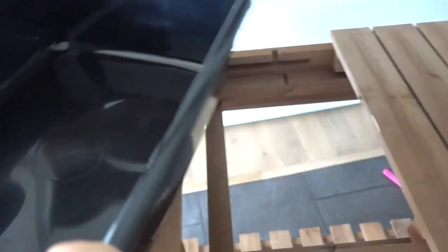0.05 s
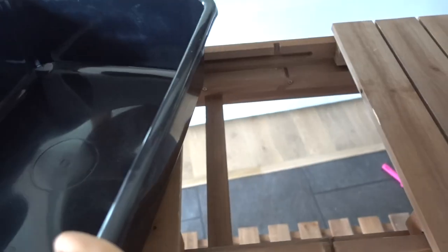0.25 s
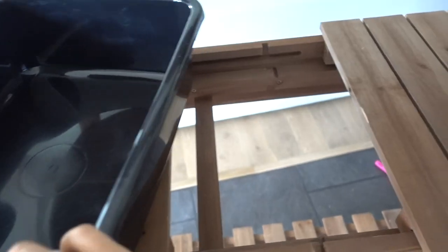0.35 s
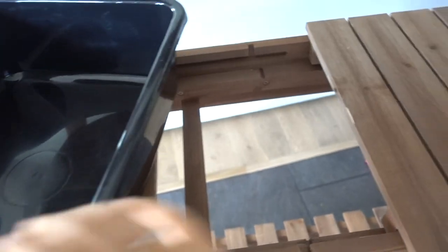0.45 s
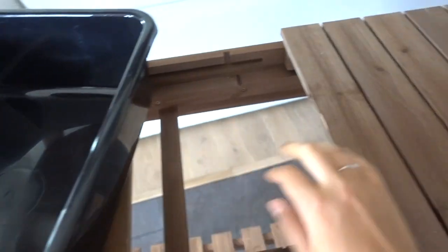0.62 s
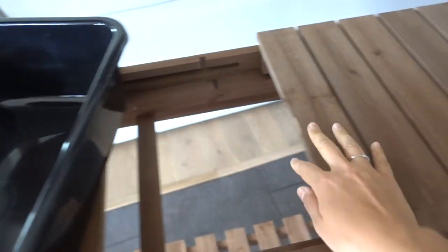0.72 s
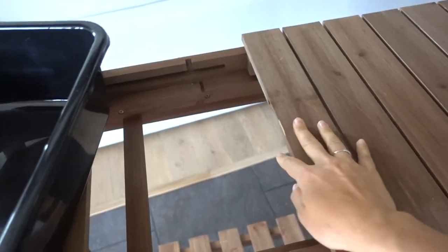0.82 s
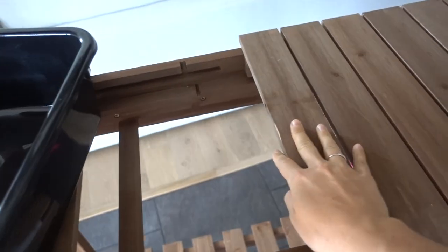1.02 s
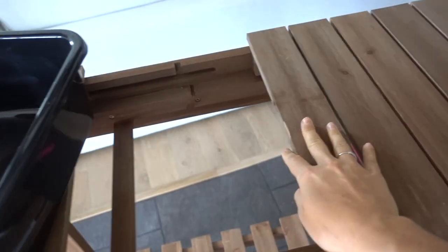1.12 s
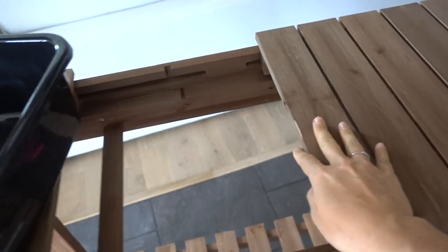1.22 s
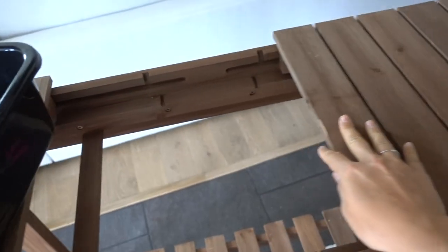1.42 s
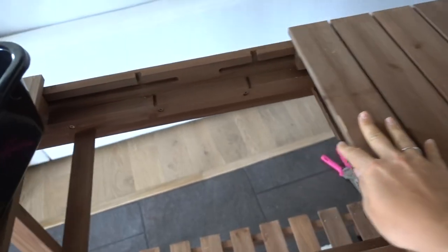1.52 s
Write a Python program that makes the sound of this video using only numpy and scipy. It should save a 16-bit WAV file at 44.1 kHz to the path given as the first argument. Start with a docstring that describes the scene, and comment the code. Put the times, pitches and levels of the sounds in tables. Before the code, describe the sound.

A plastic tub drops into a wooden bench frame with a loud, close cluster of hollow knocks, rocking to rest; then a faint hand pat and brush, and a dry scrape of sliding slats over low room rumble.

```python
"""First a cluster of hollow knocks: a plastic tub drops into the frame of a wooden bench and rocks to rest.
A hand lands on the slatted top and brushes over it, then pushes the slats with a dry, even wooden rub.
Knocks sum decaying modes and dense noise; brush and rub filter frictional slips through resonances.
Damped bumps and narrow bands of swelling noise come from the rails; a low rumble of shaped noise lies beneath.
"""
import sys
import numpy as np
from scipy import signal
from scipy.fft import rfft, irfft, next_fast_len
from scipy.io import wavfile

SR = 44100
rng = np.random.default_rng(int(sys.argv[2]) if len(sys.argv) > 2 else 0)


def wav_record(signal):
    """Record a signal, one row per channel, as 16-bit PCM in the file named by sys.argv[1]."""
    frames = np.transpose(np.atleast_2d(signal))
    bounded = np.clip(frames, -1, 1)
    # unit amplitude maps onto the largest positive 16-bit level
    quanta = np.round(bounded * 32767).astype(np.int16)
    wavfile.write(sys.argv[1], SR, quanta)


N = 68355
T = np.arange(N) / SR  # time/s
FFT_SIZE = 2 * next_fast_len(N // 2 + 4000, True)
HZ = np.maximum(np.arange(FFT_SIZE // 2 + 1) * SR / FFT_SIZE, 1)  # frequency axis, kept above zero

# Knocks of the tub on the frame: [t/s, boom level/dB, clack level/dB, contact low-pass f/Hz]
TUB_KNOCKS = [(0.242, 2.5, -1, 8900), (0.2481, -8.5, -2.5, 2200), (0.2580, -7, 2.5, 800),
              (0.2654, -15, 3, 1000), (0.2827, -8.5, -4.5, 1400), (0.3045, 0, -7.5, 900),
              (0.3153, -5.5, -4, 6160), (0.3220, -8.5, -2.5, 2000), (0.3654, -4.5, -4, 3100),
              (0.3971, -17.5, -11.5, 1200), (0.4483, -9, -12, 1200), (0.5000, -28.5, -40, 600)]
# Modes of tub and bench: [f/Hz, level/dB, t60/s, left minus right level/dB]
BENCH_MODES = [(50.7, -32, 0.37, 0.5), (96.6, -28.5, 0.35, 0), (111, -29.5, 0.41, .5),
               (164, -30.5, 0.45, 1.5), (207, -26.5, 0.64, 2.5), (233.1, -19, 0.36, 0), (265, -25, 0.44, 0),
               (285, -20.5, 0.23, 2), (391.2, -27.5, 0.25, -2), (440.3, -26.5, 0.25, 2.5),
               (473.8, -28.5, 0.39, 4), (649, -39, 0.39, 9.5), (968, -37.5, .3, -5), (1032, -33.5, 0.38, 2),
               (1986, -34, 0.25, -3)]
# Spectrum of the crowd of short-lived modes in a knock: [f/Hz, relative density level/dB per Hz]
CLACK_SPECTRUM = [(30, -13), (70, 0), (150, -12.5), (280, 4.5), (480, 2), (590, -5), (1000, -1.5),
                  (1400, -8.5), (2300, -5.5), (4500, -14.5), (9000, -23), (15000, -41)]
# Decay of that crowd: [f/Hz, t60/s]
CLACK_DECAY = [(100, 0.2), (1000, 0.08), (10000, 0.018)]
# Spectrum of the knock's echo in the room: [f/Hz, relative density level/dB per Hz]
ECHO_SPECTRUM = [(40, -4), (110, 8), (280, 3.5), (490, 2.5), (600, -4.5), (1000, -5.5), (2200, -8),
                 (4500, -16), (9000, -24), (15000, -32.5)]
# Decay of the echo: [f/Hz, t60/s]
ECHO_DECAY = [(100, 0.71), (500, 0.63), (2500, 0.57), (10000, 0.6)]
# Spectrum of the palm's pat: [f/Hz, relative density level/dB per Hz]
PALM_SPECTRUM = [(60, -32), (180, -3), (280, 1.5), (380, 3), (600, -25), (1200, -46), (4000, -50)]
# Modes of the slats under the pat: [f/Hz, level/dB, t60/s]
PALM_MODES = [(280.2, -43, 0.33), (375, -44, 0.64)]
# Spectrum of skin brushing the slats: [f/Hz, relative density level/dB per Hz]
BRUSH_SPECTRUM = [(300, -2), (700, -1.5), (1600, -8.5), (2900, -3.5), (5000, -6.5), (7000, -11),
                  (11000, -13.5), (15000, -17)]
# Resonances of the brushed slats: [f/Hz, width/Hz, lift/dB]
BRUSH_RESONANCES = [(2380, 40, 10), (2894, 33, 15), (5020, 400, 4.5)]
# Course of the sliding slats: [t/s, level/dB]
SLIDE_LEVEL = [(1.0, -70), (1.055, -53.5), (1.10, -43), (1.15, -38.5), (1.21, -35.5), (1.30, -35),
               (1.40, -35.5), (1.44, -32.5), (1.48, -34), (1.55, -32.5)]
# Spectrum of wood rubbing on wood: [f/Hz, relative density level/dB per Hz]
RUB_SPECTRUM = [(60, -52), (200, -11.5), (350, -3.5), (600, -2.5), (950, 0), (1800, -0.5), (3000, -3),
                (4500, -6), (6500, -9), (10500, -11), (15000, -16)]
# Resonances of the rubbed boards: [f/Hz, width/Hz, lift/dB]
RUB_RESONANCES = [(351, 25, 6), (772, 100, 4), (1525, 33, 5.5), (2680, 130, 4), (2930, 57, 1),
                  (3250, 49, 0.5), (4130, 140, 7), (5000, 100, 5.5), (10850, 700, 3)]
# Stereo balance of the rub: [f/Hz, left minus right level/dB]
RUB_BALANCE = [(700, 0), (1300, -2.3), (2400, -2), (4400, -4.5), (8000, -1.5), (15000, 1)]
# Soft bumps of the wooden top: [t/s, f/Hz, level/dB, t60/s]
TOP_BUMPS = [(0.722, 230, -45, 0.21), (0.992, 212.4, -43.5, 0.21), (1.105, 276, -39.5, .12),
             (1.107, 127, -40, 0.13), (1.334, 143, -35.5, 0.305), (1.388, 350, -31.5, 0.056)]
# Brief singing of the rails: [centre t/s, time from centre to 1/e in s, f/Hz, width/Hz, peak level/dB]
RAIL_SQUEAKS = [(1.221, 0.064, 328, 39.8, -46), (1.44, 0.049, 777, 29.2, -43.5),
                (1.475, 0.038, 1538, 69.6, -46), (1.498, 0.047, 4175, 150, -44), (1.55, 0.03, 717, 30, -54)]
# Spectrum of the background rumble: [f/Hz, relative density level/dB per Hz]
RUMBLE_SPECTRUM = [(25, -12), (50, -7), (75, 1), (115, 0), (160, -2.5), (280, -8), (420, -5.5), (700, -17),
                   (1100, -20), (1600, -23.5), (2050, -18), (2400, -24), (2800, -28.5), (4500, -28.5),
                   (6000, -30.5), (15000, -35.5)]
# Resonances in the rumble: [f/Hz, width/Hz, lift/dB]
RUMBLE_RESONANCES = [(102, 12, 4), (385, 60, 0)]
# Likeness of the two channels of any noise: [f/Hz, left-right correlation]
STEREO_CORRELATION = [(60, .999), (130, 1), (290, 0.99), (640, 0.92), (1400, 0.7), (3100, 0.5),
                      (5000, 0.05), (7000, -0.2), (10000, -0.13), (15000, .2)]

CLACK_DB, ECHO_DB, KNOCK_PAN_DB = -18.5, -27.5, 0.5  # pan is left minus right
CRACK_DB, CRACK_DECAY_S = -20, 0.0014  # time to fall to 1/e
THUMP_DB, THUMP_HZ, THUMP_T60_S = -17.5, 190, 0.037
MIC_SPREAD_S = 0.0001  # standard deviation of a mode's delay between microphones
PALM_START_S, PALM_DB, PALM_T60_S = 0.8355, -43, 0.54
BRUSH_START_S, BRUSH_ATTACK_S, BRUSH_HOLD_S, BRUSH_T60_S, BRUSH_DB = 0.831, 0.03, 0.06, 0.47, -49.5
GRAINS_PER_S, GRAIN_SPREAD_DB = 3500, 2
GRAIN_SHARE = 0.45  # share of friction power in slips; smooth hiss has the rest
SLIDE_TREBLE_HZ, TREBLE_FOLLOWS = 5960, 0.4  # extra treble change, dB per dB of slide level
RIPPLE_DB, RIPPLE_HZ = 2, 44.68  # standard deviation and spacing of the boards' uneven response
RUMBLE_DB = -49
LOW_CUT_HZ, CUTOFF_HZ = 26, 15750


def tub():
    """Impact excitation: each contact drives modes and echo, and a softer contact passes less treble."""
    boom = bench_boom()
    balance = from_db([[KNOCK_PAN_DB / 2], [-KNOCK_PAN_DB / 2]])
    out = 0
    for start_s, boom_db, clack_db, bright_hz in TUB_KNOCKS:
        clack = balance * knock_clack()
        knock = from_db(boom_db) * boom + from_db(clack_db) * clack
        contact = signal.butter(1, bright_hz, fs=SR, output="sos")
        out = out + delayed(signal.sosfilt(contact, knock), start_s)
    return out


def bench_boom():
    """Modal superposition: damped modes of alternating sign, with the push of air at each contact."""
    boom = from_db(THUMP_DB) * ring(THUMP_HZ, THUMP_T60_S)
    for k, (hz, db, t60, pan_db) in enumerate(BENCH_MODES):
        boom = boom + (-1) ** k * from_db(db) * mode(hz, t60, pan_db)
    return boom


def knock_clack():
    """High modal density: a crowd of modes sounds as decaying noise, with a crack and the room's echo."""
    crowd = from_db(CLACK_DB) * dying(CLACK_SPECTRUM, CLACK_DECAY)
    crack = from_db(CRACK_DB) * np.exp(-T / CRACK_DECAY_S)
    echo = from_db(ECHO_DB) * dying(ECHO_SPECTRUM, ECHO_DECAY)
    return crowd + crack + echo


def mode(hz, t60, pan_db):
    """Interaural cues: one damped mode reaches two microphones at unequal levels and times."""
    sides = np.array([[1], [-1]]) / 2
    lag = MIC_SPREAD_S * rng.normal() * sides
    envelope = from_db(pan_db * sides - 60 * T / t60)
    return envelope * np.sin(2 * np.pi * hz * (T + lag))


def hand():
    """Impact, then friction: the palm makes the slats ring and the skin brushes over them."""
    pat = from_db(PALM_DB - 60 * T / PALM_T60_S) * noise(PALM_SPECTRUM)
    for hz, db, t60 in PALM_MODES:
        pat = pat + from_db(db) * ring(hz, t60)
    attack = np.minimum(T / BRUSH_ATTACK_S, 1)
    fading_s = np.maximum(T - BRUSH_ATTACK_S - BRUSH_HOLD_S, 0)
    stroke = attack * from_db(BRUSH_DB - 60 * fading_s / BRUSH_T60_S)
    brush = stroke * coloured(friction(), BRUSH_SPECTRUM, BRUSH_RESONANCES)
    return delayed(pat, PALM_START_S) + delayed(brush, BRUSH_START_S)


def slats():
    """Friction-driven resonance: wood rubs on wood, and its treble grows faster than its level."""
    s, db = np.transpose(SLIDE_LEVEL)
    level_db = np.interp(T, s, db)
    pan_db = at_hz(RUB_BALANCE, HZ) / 2
    rub = coloured(friction(), RUB_SPECTRUM, RUB_RESONANCES)
    rub = filtered(rub, from_db([pan_db, -pan_db]) * ripple())
    treble = filtered(rub, 1 / (1 + (SLIDE_TREBLE_HZ / HZ) ** 4))
    # the treble is complete at the loudest level and weaker below it
    following = treble * from_db(TREBLE_FOLLOWS * (level_db - db.max()))
    return (rub - treble + following) * from_db(level_db) * (T > s[0])


def friction():
    """Stick-slip: fibres catch and let go in tiny slips of uneven size over a smooth hiss."""
    size_db = GRAIN_SPREAD_DB * np.minimum(rng.exponential(1, (2, N)), 5)
    sizes = from_db(size_db) * rng.choice([-1, 1], (2, N))
    slips = rms_one(sizes * (rng.random(N) < GRAINS_PER_S / SR))
    hiss = rng.standard_normal((2, N))
    return np.sqrt(GRAIN_SHARE) * slips + np.sqrt(1 - GRAIN_SHARE) * hiss


def ripple():
    """Modal overlap: countless small resonances give the boards a fine, uneven response."""
    grid = np.arange(0, SR / 2, RIPPLE_HZ)
    return from_db(RIPPLE_DB * np.interp(HZ, grid, rng.standard_normal(len(grid))))


def rails():
    """Damped and sustained resonance: the top bumps on its rails; narrow friction bands swell and fade."""
    out = 0
    for start_s, hz, db, t60 in TOP_BUMPS:
        out = out + delayed(from_db(db) * ring(hz, t60), start_s)
    for centre_s, length_s, hz, width_hz, db in RAIL_SQUEAKS:
        band = 1 / (1 + (2 * (HZ - hz) / width_hz) ** 2)
        tone = rms_one(filtered(noise(RUB_SPECTRUM), band))
        swell = np.exp(-((T - centre_s) / length_s) ** 2)
        out = out + from_db(db) * swell * tone
    return out


def rumble():
    """Stationary random noise: a steady background with a fixed spectrum."""
    source = rng.standard_normal((2, N))
    return from_db(RUMBLE_DB) * coloured(source, RUMBLE_SPECTRUM, RUMBLE_RESONANCES)


def ring(hz, t60):
    """Free damped vibration: one mode struck at time zero falls 60 dB in t60 seconds."""
    return np.sin(2 * np.pi * hz * T) * from_db(-60 * T / t60)


def dying(spectrum, t60s):
    """Frequency-dependent damping: in a struck crowd of modes each octave band has its own decay."""
    crowd = noise(spectrum)
    out = 0
    for hz in 30 * 2.0 ** np.arange(10):
        octave = np.maximum(1 - abs(np.log2(HZ / hz)), 0)  # overlapping triangles
        out = out + filtered(crowd, octave) * from_db(-60 * T / at_hz(t60s, hz))
    return out


def noise(spectrum):
    """Random excitation: stereo Gaussian noise with a given spectrum."""
    return coloured(rng.standard_normal((2, N)), spectrum)


def coloured(source, spectrum, rings=()):
    """Source-filter principle: spectrum, resonances and channel correlation shape a pair to rms 1."""
    gain = from_db(at_hz(spectrum, HZ)) / (1 + (20 / HZ) ** 2)
    for hz, width_hz, lift_db in rings:
        resonance = 1 / (1 + 1j * (HZ ** 2 - hz ** 2) / (HZ * width_hz))
        gain = gain * (1 + (from_db(lift_db) - 1) * resonance)
    alike = np.clip(at_hz(STEREO_CORRELATION, HZ), -1, 1)
    mid, side = filtered(source, gain * np.sqrt([1 + alike, 1 - alike]))
    return rms_one(np.array([mid + side, mid - side]))


def filtered(x, gain):
    """Linear filtering: multiply the spectrum by a response given on HZ."""
    return irfft(rfft(x, FFT_SIZE) * gain, FFT_SIZE)[..., :N]


def delayed(x, s):
    """Time shift: start a sound s seconds later."""
    lag = int(s * SR)
    return np.concatenate([np.zeros(x.shape[:-1] + (lag,)), x[..., :N - lag]], axis=-1)


def at_hz(points, hz):
    """Logarithmic frequency scale: interpolate a table's second column against log f."""
    table = np.array(points)
    return np.interp(np.log(hz), np.log(table[:, 0]), table[:, 1])


def rms_one(x):
    """Mean-square power: scale to rms 1."""
    return x / np.sqrt(np.mean(x ** 2) + 1e-20)


def from_db(db):
    """Level law: convert decibels to amplitude gain."""
    return 10 ** (np.asarray(db) / 20)


def scene():
    """Superposition: tub, hand, sliding slats and rails add to the background rumble."""
    return tub() + hand() + slats() + rails() + rumble()


def record(dry):
    """Band limitation: the microphone loses the deepest bass and the top is cut steeply."""
    low_cut = signal.butter(2, LOW_CUT_HZ, "high", fs=SR, output="sos")
    return filtered(signal.sosfilt(low_cut, dry), HZ < CUTOFF_HZ)


dry = scene()
out = record(dry)
wav_record(out)
```